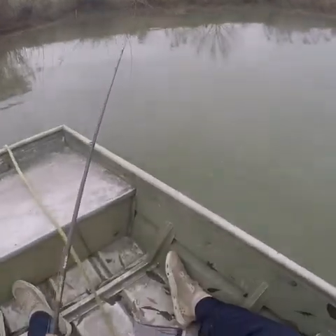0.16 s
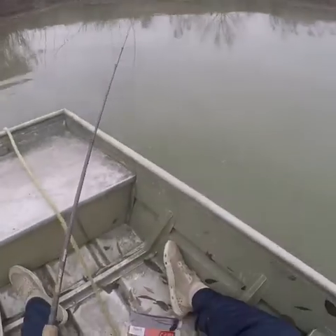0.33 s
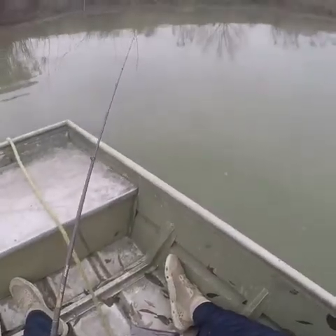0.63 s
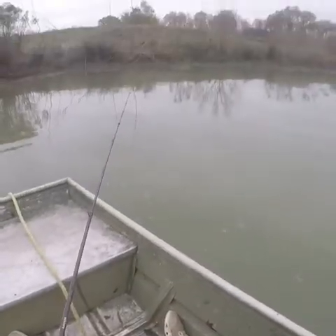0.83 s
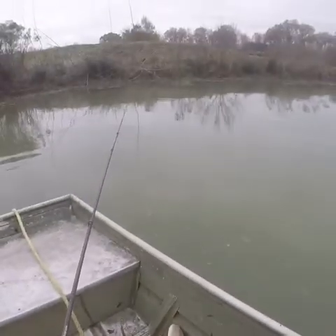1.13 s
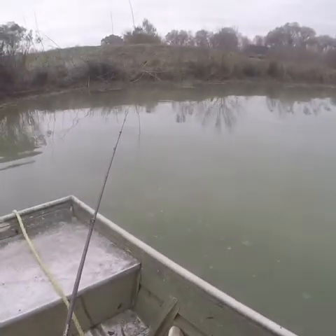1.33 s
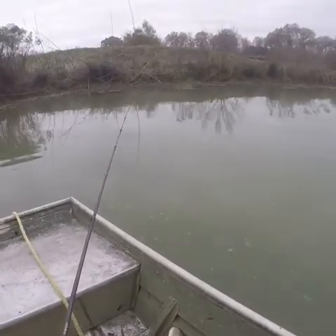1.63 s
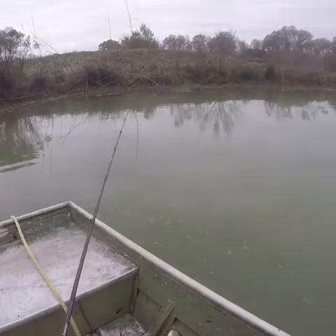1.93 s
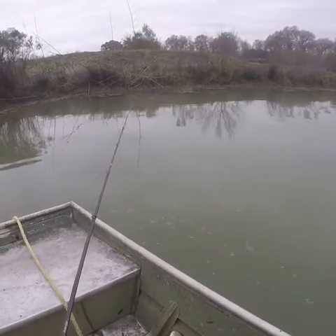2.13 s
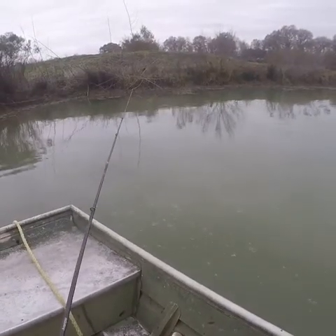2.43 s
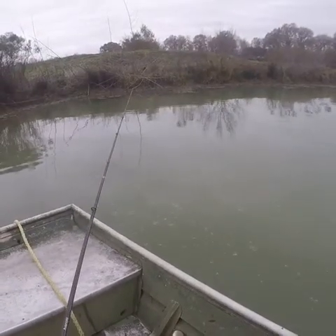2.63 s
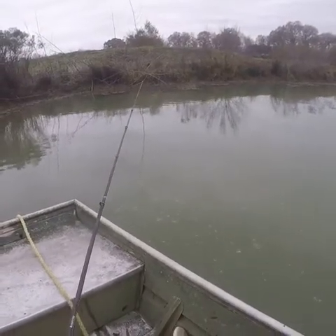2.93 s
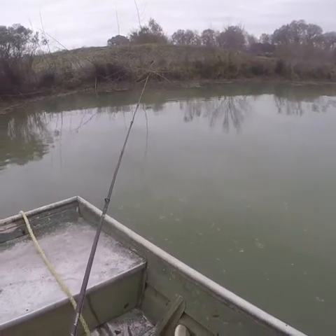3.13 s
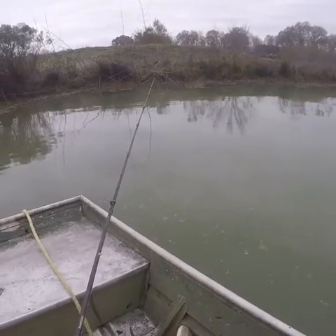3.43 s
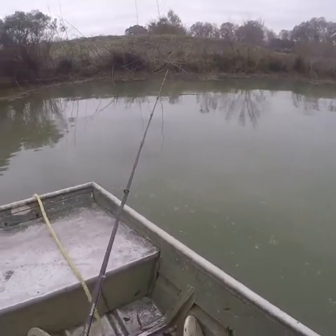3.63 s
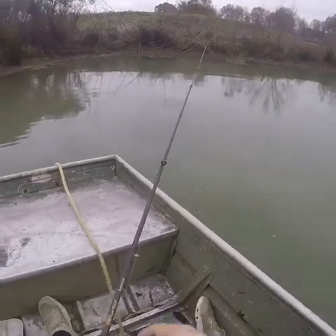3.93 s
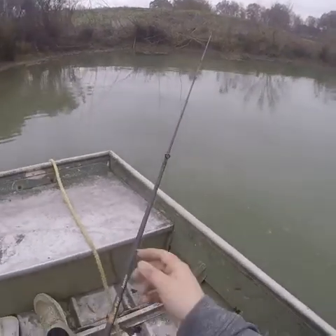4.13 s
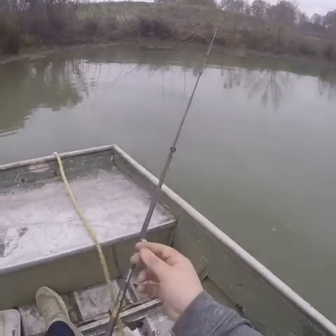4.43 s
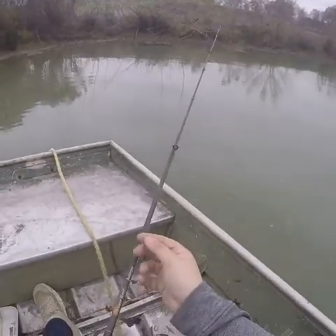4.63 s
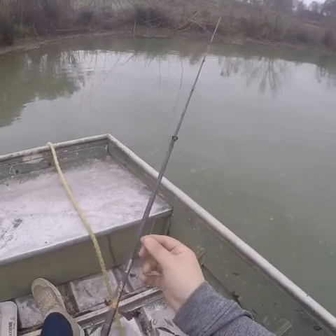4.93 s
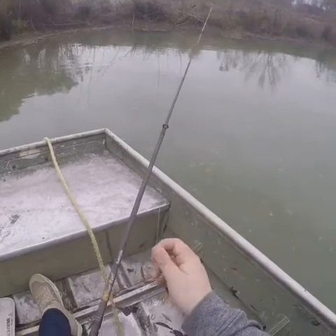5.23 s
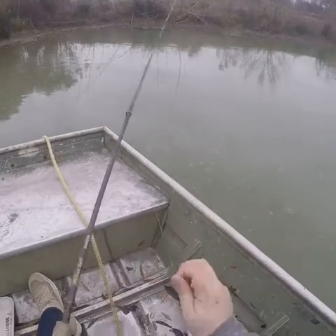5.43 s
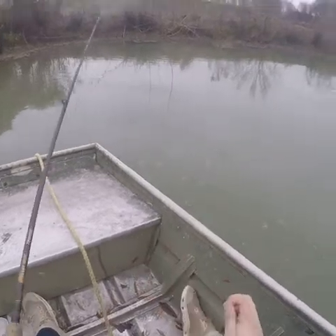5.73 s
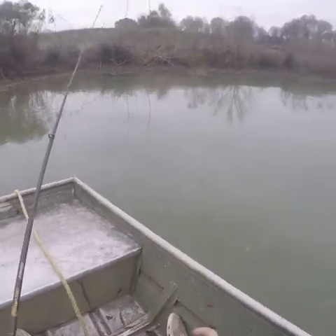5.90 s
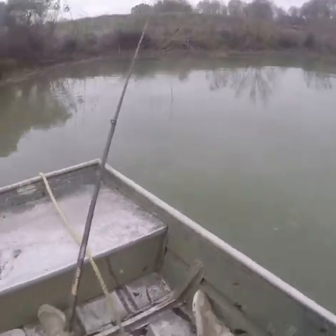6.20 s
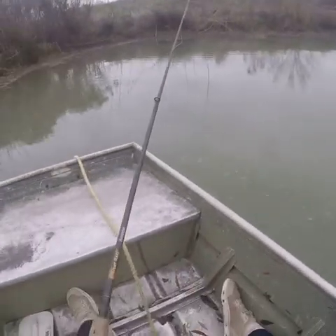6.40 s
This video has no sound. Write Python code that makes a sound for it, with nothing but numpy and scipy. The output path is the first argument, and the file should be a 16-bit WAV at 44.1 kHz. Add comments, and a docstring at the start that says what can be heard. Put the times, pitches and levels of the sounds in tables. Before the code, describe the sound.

Shoes and gear knock against the hull of a small aluminium boat on a still pond, each blow a short clank with a hollow boom under it. Two louder knocks land near the start and a little before the middle, and lighter ones continue unevenly to the end. Close to the body-worn microphone, rod and tackle tick and cloth rubs faintly, over a low rumble and a thin hiss.

```python
"""An angler shifts about in a small aluminium boat on a still pond, heard from a body-worn microphone.
From the start the drifting boat rumbles under a faint hiss and whine, and shoes and gear knock the hull:
the sheet clanks at once, the panels knock, the floor booms a moment later. The loudest blows land at
0.5 s and 2.6 s. Lighter ones go on to the end, while rod and tackle tick and cloth rubs close by."""
import sys
import numpy as np
from scipy.fft import rfft, irfft, next_fast_len
from scipy.io import wavfile
from scipy.ndimage import map_coordinates

SR = 44100
rng = np.random.default_rng(int(sys.argv[2]) if len(sys.argv) > 2 else 0)


def digitize_waveform(pressure):
    """Quantize a signal to 16-bit integers and store it at the path in sys.argv[1].

    Rows of a 2-D input are taken as channels; values are limited to [-1, 1].
    """
    field = np.atleast_2d(pressure).T
    bounded = np.clip(field, -1, 1)
    quanta = np.round(bounded * 32767).astype(np.int16)
    wavfile.write(sys.argv[1], SR, quanta)


N = 289296

# blows on the hull: t/s, knock level/dB, weight/dB (floor boom over the knock),
# hardness/dB (sheet clank over the knock), f/Hz of the struck panel
KNOCKS = [(0.0, -41, 5, -9.5, 353), (0.068, -41.5, 3.5, -34, 328), (0.477, -26.5, -2.5, -19, 446),
          (0.754, -44, 9, -10.5, 350), (0.786, -46, 8, -14, 420), (1.027, -43, 0, -18.5, 330),
          (1.19, -37.5, 3.5, -21, 293), (1.234, -47.5, -1, -9.5, 312), (1.424, -44.5, 6, -16, 503),
          (1.478, -51, 13.5, -9, 320), (1.8, -42, 11.5, -17.5, 410), (2.354, -46, 8, -31, 410),
          (2.562, -28.5, 0, -15, 396), (2.78, -50, 11.5, -26, 405), (2.92, -46.5, 6.5, -25, 326),
          (2.998, -49.5, 8.5, -15.5, 375), (3.278, -40.5, 5.5, -22.5, 536), (3.395, -51, -1, -24, 400),
          (3.558, -53.5, 8, -28, 300), (3.667, -37.5, -0.5, -21.5, 400), (3.975, -37, -4, -13, 340),
          (4.192, -49, 11, -16.5, 305), (4.394, -46, 0.5, -38, 450), (4.479, -43.5, -10, -50, 404),
          (4.587, -42.5, -16, -25.5, 434), (4.76, -56, 19, -30, 342), (4.856, -54, 15.5, -12.5, 415),
          (5.123, -52.5, 4, -11, 320), (5.258, -39.5, 9, -20.5, 360), (5.78, -52, -9, -21, 370),
          (5.887, -51, 6.5, -12.5, 298), (6.113, -42, 4.5, -23.5, 365)]


def amp(db):
    """Decibels to gain."""
    return 10 ** (np.asarray(db) / 20)


def unit(x):
    """Scale to rms 1."""
    return x / np.sqrt(np.mean(x ** 2) + 1e-20)


def burst(x):
    """Scale a transient to the energy of 50 ms at rms 1."""
    return x / np.sqrt(np.sum(x ** 2) / (SR / 20) + 1e-20)


def fade(t, t60):
    """Exponential decay, 60 dB down after t60."""
    return np.exp(-np.log(1000) * t / t60)


def wobble(rate):
    """A smooth random curve, rate knots a second."""
    return map_coordinates(rng.standard_normal(int(N * rate / SR) + 4), [np.arange(N) * rate / SR])


def noise(gain, size):
    """Noise of rms 1, coloured by a gain function of frequency."""
    m = next_fast_len(size)
    spectrum = rfft(rng.standard_normal(m)) * gain(np.fft.rfftfreq(m, 1 / SR) + 1)
    return unit(irfft(spectrum, m)[:size])


def colour(points):
    """Gain function through (f/Hz, level/dB) points on a log axis."""
    f, db = np.transpose(points)
    return lambda hz: amp(np.interp(np.log(hz), np.log(f), db))


def peak(hz, centre, width):
    """A resonance curve of height 1, width Hz across at half height."""
    return 1 / (1 + (2 * (hz - centre) / width) ** 2)


def ring(modes, t, scatter_db, phase_spread):
    """Decaying modes; each point of impact gives them new strengths and phases."""
    hz, db, t60 = np.transpose(modes)[:, :, None]
    strength = amp(db + scatter_db * rng.standard_normal(hz.shape))
    phase = phase_spread * rng.standard_normal(hz.shape)
    return burst(np.sum(strength * fade(t, t60) * np.sin(2 * np.pi * hz * t + phase), axis=0))


def add(track, s, sound):
    """Mix a sound into the track at time s."""
    start = max(round(s * SR), 0)
    part = track[start:start + len(sound)]
    part += sound[:len(part)]


def background():
    """Out on the pond, the drifting hull rumbles unevenly under the hiss of still air and a thin whine."""
    # spectrum of the drifting hull: f/Hz, level/dB
    rumble_spectrum = [(12, -32), (27, -0.5), (66, 1.5), (120, -3), (160, -17.5), (230, -19.5), (330, -25),
                       (480, -20.5), (800, -40), (2000, -68)]
    # spectrum of the air: f/Hz, level/dB
    hiss_spectrum = [(200, -20), (700, -1.5), (1300, -0.5), (2000, -3), (3700, -4), (5000, -3.5),
                     (5600, -7), (7000, -9.5), (13500, -12.5), (15300, -16)]
    # thin steady whines: f/Hz, width/Hz, level/dB
    whines = [(1305, 190, -86), (5050, 83, -84.5), (13500, 200, -96)]
    rumble = amp(-47 + 3.5 * wobble(5)) * noise(colour(rumble_spectrum), N)
    hiss = amp(-68.5 + 0.18 * wobble(1.97)) * noise(colour(hiss_spectrum), N)
    whine = sum(amp(db) * noise(lambda f: peak(f, hz, width), N) for hz, width, db in whines)
    return rumble + hiss + whine


def rubs():
    """Right by the microphone, cloth slides in short grainy swells, each with its own rasp."""
    # light rubs of sleeve and line: t/s of the middle, length/s, level/dB, f/Hz of the rasp
    strokes = [(1.386, 0.064, -59.5, 2480), (1.494, 0.15, -65.5, 2000), (2.198, 0.021, -52, 5440),
               (2.546, 0.023, -59, 4475), (2.942, 0.03, -67, 5000), (3.806, 0.022, -66, 1800),
               (3.877, 0.011, -61, 1740), (4.187, 0.02, -57, 4200), (4.33, 0.056, -65, 5500),
               (5.6, 0.036, -68.5, 6300)]
    out, t = np.zeros(N), np.arange(-SR // 10, SR // 10) / SR
    cloth = colour([(700, -1), (2300, -2.0), (5000, -3.5), (8000, -8.0), (15000, -19)])
    for s, length, db, rasp_hz in strokes:
        rasp = lambda hz: cloth(hz) * (1 + 3.4 * peak(hz, rasp_hz, width=0.3 * rasp_hz))
        swell = np.exp(-(2 * t / length) ** 2)
        add(out, s + t[0], amp(db) * swell * noise(rasp, len(t)))
    grain = unit(amp(4.3 * wobble(500)))
    return out * grain


def contacts():
    """Close by, each hard contact, of tackle or on the hull, snaps and briefly rings the camera housing."""
    # ticks of rod and tackle, and extra snaps of some blows on the hull: t/s, snap level/dB, brightness/dB
    # (treble over the snap)
    ticks = [(0.477, -40, -12), (0.784, -56.5, -7), (1.028, -59, -19.5), (1.242, -50.5, -19),
             (1.423, -57.5, -14), (1.496, -64, -10), (1.804, -62.5, -9), (1.824, -56.5, -12),
             (2.198, -69, -2.5), (2.558, -52.5, -9), (2.562, -47, -13.5), (2.938, -68.5, -9),
             (3.002, -66, -10), (3.234, -66, -4.5), (3.605, -64, -16), (3.877, -69, -26), (3.974, -54, -31),
             (4.194, -51.5, -20.5), (4.551, -72, -11), (4.588, -64, -12.5), (4.76, -73.5, -3),
             (4.858, -59.5, -7.5), (5.124, -59, -34), (5.887, -66.5, -9), (5.905, -69, -14)]
    # short, bright ring of the camera housing after each snap: f/Hz, level/dB, t60/s
    housing_modes = [(2727, 0.5, 0.033), (3033, -0.5, 0.043), (3890, -14, 0.032), (4170, -3.5, 0.055),
                     (4570, -1, 0.036), (4900, -4, 0.045), (5000, -26.5, .035), (6190, -7, 0.037)]
    # spectrum of the snap: f/Hz, level/dB
    snap_spectrum = [(1200, -6), (2300, 5), (3000, -0.5), (5000, 3), (6500, -9), (9000, -17.5)]
    # spectrum of the treble above it: f/Hz, level/dB
    treble_spectrum = [(4000, -12), (6500, 4.5), (8000, -4.5), (10500, 4), (12500, -12), (15500, -3)]
    out, t = np.zeros(N), np.arange(SR // 10) / SR
    attack, decay = 1 - np.exp(-t / 0.00062), fade(t, t60=0.032)
    # a blow on the hull adds a dull snap 8.5 dB under its clank
    hull_contacts = [(s, db + hardness - 8.5, -17) for s, db, _, hardness, _ in KNOCKS]
    for s, snap_db, bright_db in list(ticks) + hull_contacts:
        db_per_octave = 0.71 * (bright_db + 12.5)  # a soft contact has a darker snap too
        tilt_db = lambda hz: db_per_octave * np.log2(np.clip(hz, 2000, 7000) / 2000)
        modes = [(hz, level + tilt_db(hz), t60) for hz, level, t60 in housing_modes]
        click = burst(noise(lambda hz: colour(snap_spectrum)(hz) * amp(tilt_db(hz)), len(t)) * decay)
        snap = click + amp(-2.0) * ring(modes, t, scatter_db=1.0, phase_spread=1.62)
        treble = noise(colour(treble_spectrum), len(t)) * decay
        add(out, s, amp(snap_db) * (burst(snap * attack) + amp(bright_db) * burst(treble * attack)))
    return out


def foot_bumps():
    """Shuffling feet bump the hull faintly at uneven gaps: rows as in KNOCKS."""
    gap_s, weight_db, hardness_db, panel_hz = 0.8, 7.5, -23, 365
    bumps = [(gap_s * (k + 0.5 + 0.5 * late), -66 + 3 * force, weight_db, hardness_db, panel_hz)
             for k, (late, force) in enumerate(rng.uniform(-1, 1, size=(16, 2)))]
    return [row for row in bumps if row[0] < N / SR]


def hull_register(db, favour_db, low, high, travel, rise, t60, dense_db):
    """One register of the hull rings: a few strong modes over many damped ones, after a travel time."""
    # strong modes of the hull: f/Hz, level/dB, t60/s
    hull_modes = [(71.8, -6.5, 0.65), (86.33, -2, 0.83), (97.8, 1, 0.63), (106.9, -6.5, 0.5),
                  (118.93, 0, 0.7), (138.9, -9.5, 0.69), (178.4, 0, 0.31), (189.8, 4.5, 0.27),
                  (216.3, -2.5, 0.4), (257.5, -3.5, 0.29), (282, -5, 0.39), (309, -3.5, 0.42),
                  (337.5, -8, 0.45), (370.2, -2, 0.22), (403.5, -1, 0.17), (435.9, -2, 0.19),
                  (478.4, -1.5, .11), (527.3, -8, .13), (615.6, -12.5, 0.21), (712.5, -0.5, 0.14),
                  (859, -6, 0.17), (1097, -0.5, 0.12), (1574, -1, 0.032), (1853, 3.5, 0.027),
                  (2420, -12, 0.029), (2726, -7, 0.042)]
    # spectrum of its dense damped modes: f/Hz, level/dB
    dense_spectrum = [(60, 5), (110, 18), (200, 13.5), (330, 10), (440, 12.5), (560, 2), (700, -6),
                      (900, -5), (1800, -8.5), (3200, -17.5)]
    t = np.arange(int(1.5 * t60 * SR)) / SR
    modes = [(hz, level + favour_db(hz), life) for hz, level, life in hull_modes if low <= hz < high]
    strong = ring(modes, t, scatter_db=1.98, phase_spread=1.26)
    band = lambda hz: 1 / np.sqrt((1 + (low / hz) ** 12) * (1 + (hz / high) ** 12))
    dense_gain = lambda hz: band(hz) * colour(dense_spectrum)(hz) * amp(favour_db(hz))
    dense = burst(noise(dense_gain, len(t)) * fade(t, t60))
    attack = 1 - np.exp(-t / rise)
    sound = amp(db) * burst((strong + amp(dense_db) * dense) * attack)
    return np.pad(sound, (round(travel * SR), 0))


def hull():
    """Underfoot, each blow falls from clank to boom, as bending waves are slower the lower they are."""
    # registers, boom to clank: low f/Hz, high f/Hz, travel/s, rise/s, t60/s and level/dB of dense modes
    registers = [(68, 155, .012, 0.011, .55, -9), (142, 365, 0.00701, 0.0096, 0.43, -3.5),
                 (315, 706, 0.001726, 0.0018, 0.18, -5), (676, 2820, 0.00122, 0.002, 0.088, 5.5)]
    floor, sides, panels, sheet = registers
    rebound_s, rebound_db = 0.085, -7  # the floor booms a second time
    out = np.zeros(N)
    for s, db, weight, hardness, panel_hz in list(KNOCKS) + foot_bumps():
        tilt_db = 11 + 0.29 * hardness - 0.15 * weight  # hard blows are brighter, heavy ones darker
        # a blow favours the modes of the panel it strikes, and tilts the upper ones
        favour_db = lambda hz: (6 * peak(hz, panel_hz, width=0.3 * panel_hz)
                                + tilt_db * np.interp(hz, [320, 660, 2000], [0, 1, 1.5]))
        add(out, s, hull_register(db + hardness, favour_db, *sheet))  # clank
        add(out, s, hull_register(db, favour_db, *panels))  # knock
        add(out, s, hull_register(db - 1.1 + 0.3 * weight, favour_db, *sides))  # thud
        add(out, s, hull_register(db + weight, favour_db, *floor))  # boom
        add(out, s + rebound_s, hull_register(db + weight + rebound_db, favour_db, *floor))
    return out


def scene():
    """Everything in the boat, in mono, from where the angler is."""
    return (hull() + contacts() + rubs() + background())[None]


def record(dry):
    """The microphone of the body-worn camera keeps nothing above its band limit."""
    top_hz = 15450
    m = next_fast_len(N + SR // 2)
    passband = np.fft.rfftfreq(m, 1 / SR) < top_hz
    return irfft(rfft(dry, m) * passband, m)[:, :N]


dry = scene()
out = record(dry)
digitize_waveform(out)
```